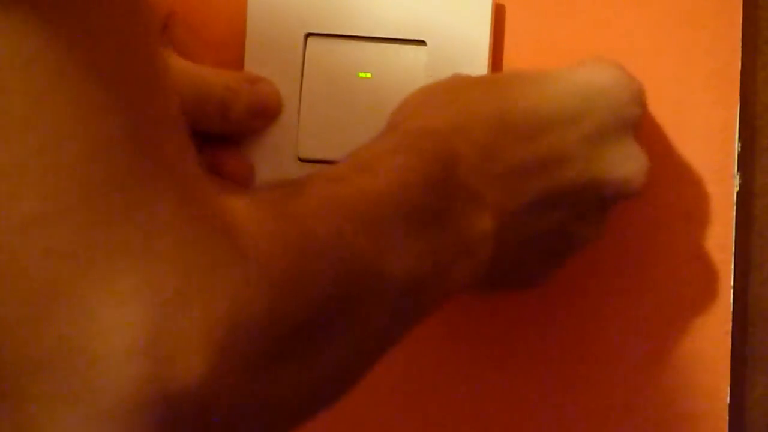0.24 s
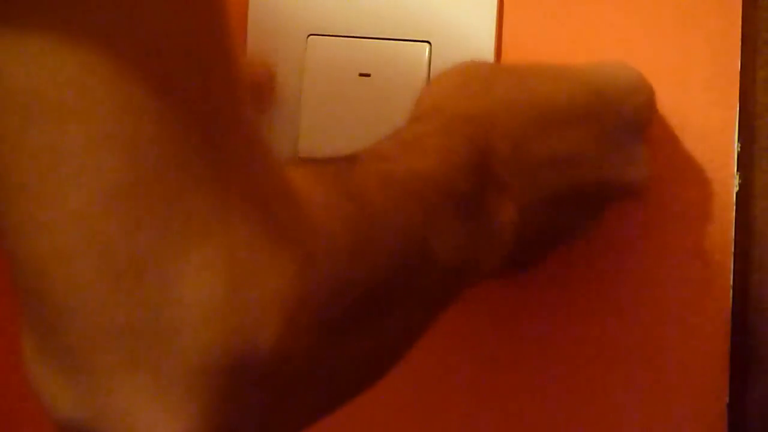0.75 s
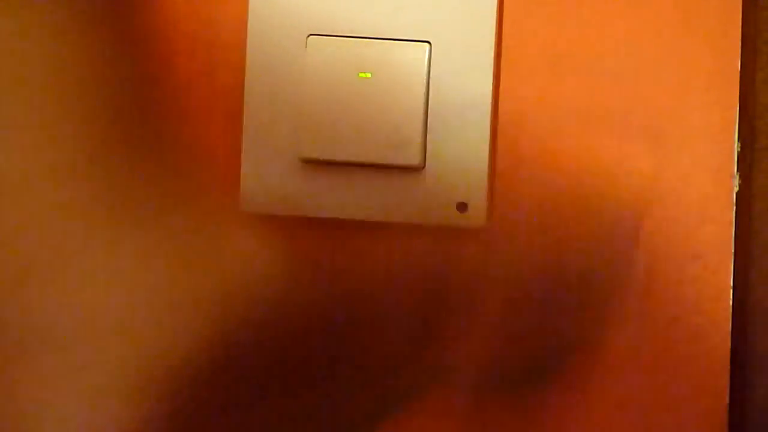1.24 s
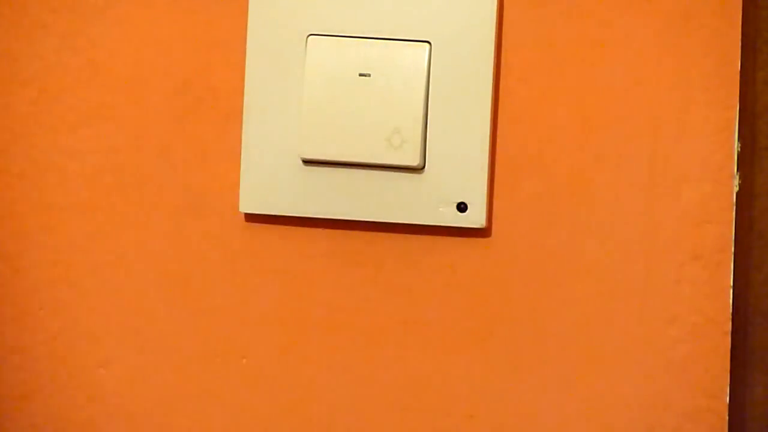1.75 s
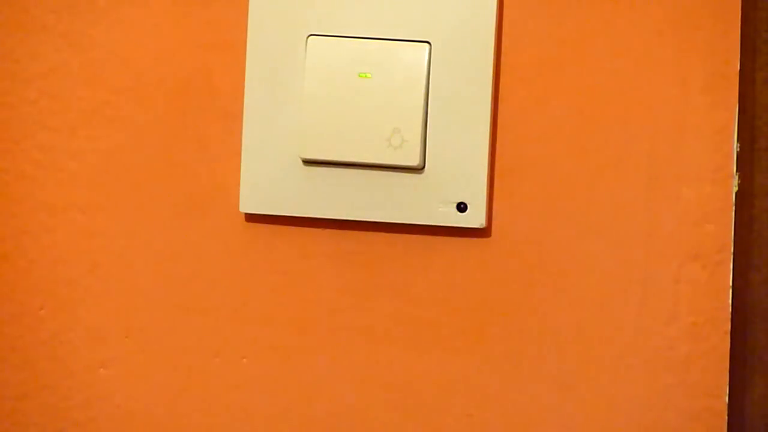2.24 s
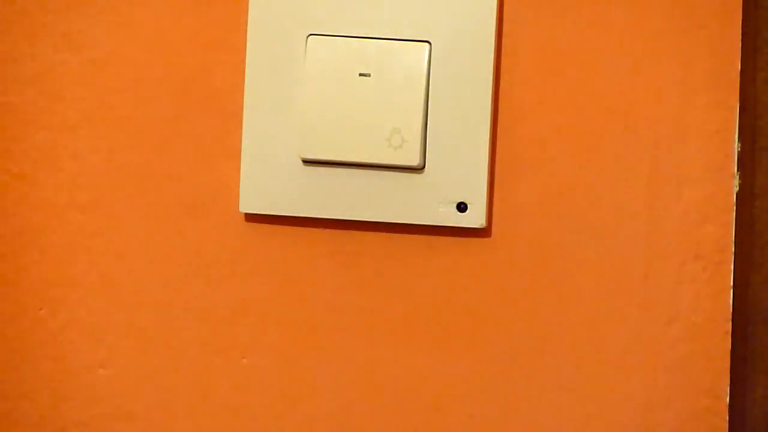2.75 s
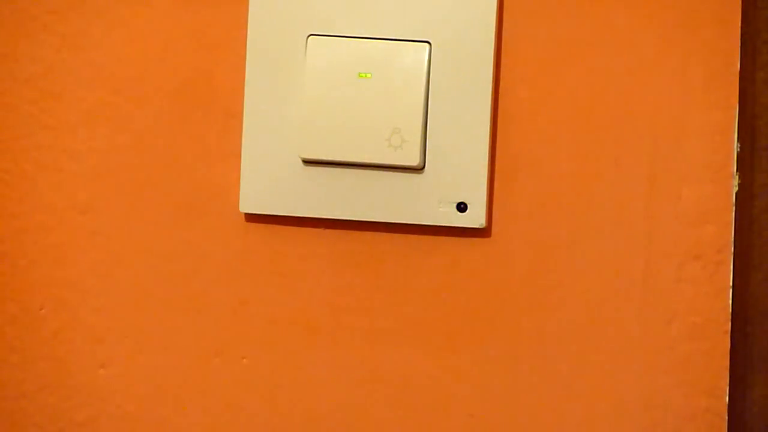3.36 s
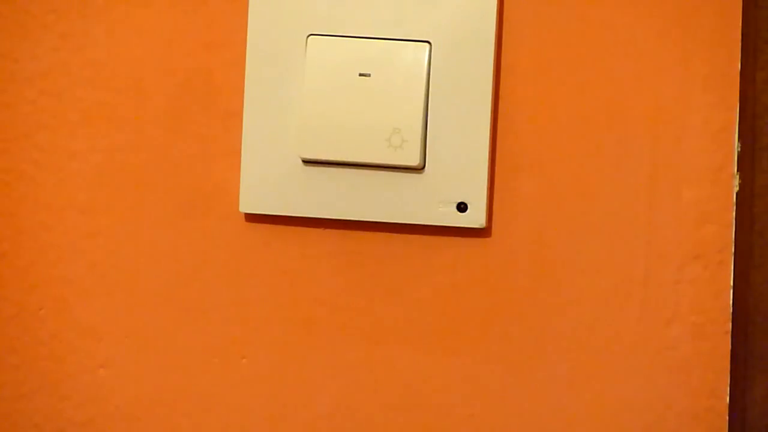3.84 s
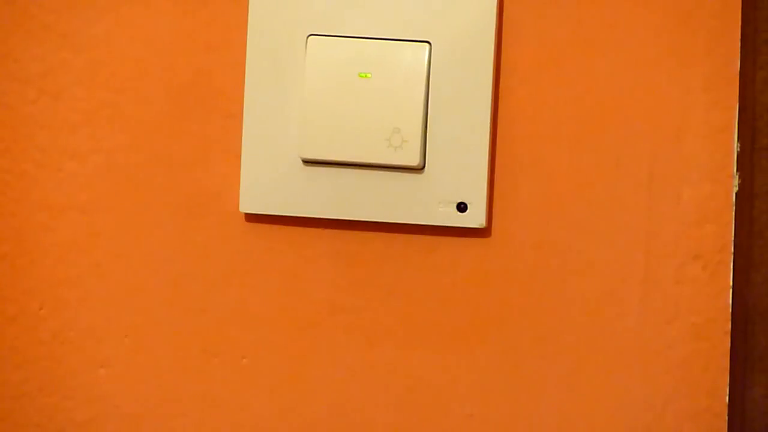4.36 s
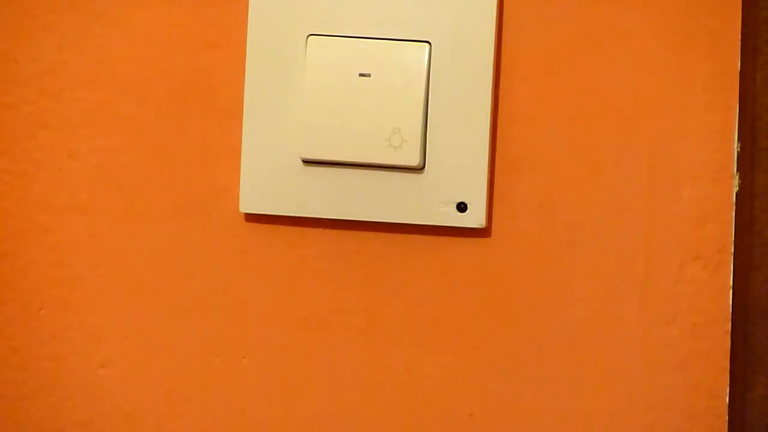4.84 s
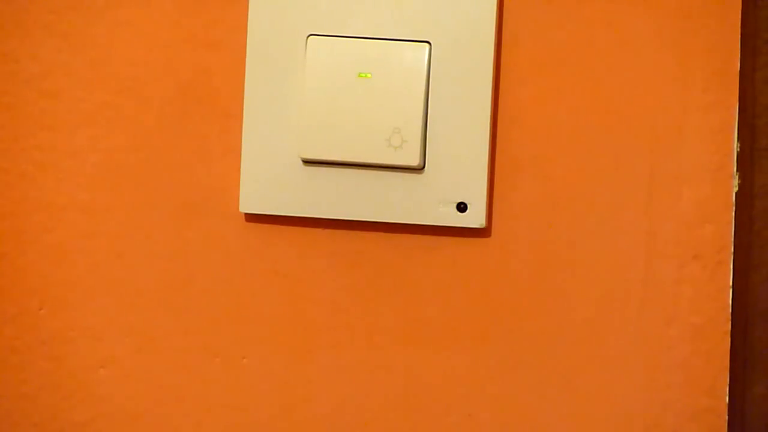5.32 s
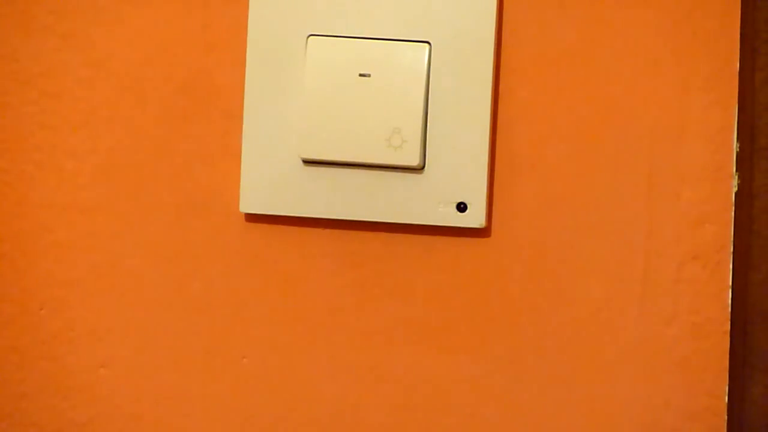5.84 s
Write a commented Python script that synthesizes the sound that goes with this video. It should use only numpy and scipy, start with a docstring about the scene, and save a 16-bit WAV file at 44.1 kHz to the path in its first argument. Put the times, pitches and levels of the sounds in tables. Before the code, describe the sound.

A plastic wall button is pressed close to the microphone with a sharp click, a brief springy ring and a low bump. Someone then moves about, with rustling clothes, a few hollow clacks and soft knocks. About five seconds after the press, a relay snaps over with a short metallic rattle. An appliance hums low and steady throughout in the small, hard-walled hallway.

```python
"""Wall button and relay in a hallway

A plastic pushbutton is pressed close by in a small hard-walled hallway; five seconds later a relay
snaps over. Each is a burst of hard contacts heard through a shell, with metal parts ringing on.
In between, someone moves about with soft knocks, hollow clacks and rustling clothes.
An appliance hums steadily over quiet room air."""
import sys
import numpy as np
from scipy import signal
from scipy.fft import rfft, irfft, next_fast_len
from scipy.io import wavfile
from scipy.ndimage import map_coordinates

SR = 44100
rng = np.random.default_rng(int(sys.argv[2]) if len(sys.argv) > 2 else 0)


def generate_wav(signal):
    """Clip the signal to [-1, 1] and save it as 16-bit WAV at the path in sys.argv[1]."""
    frames = np.transpose(np.atleast_2d(signal))
    scaled = np.clip(frames, -1, 1) * 32767
    pcm = np.round(scaled).astype(np.int16)
    wavfile.write(sys.argv[1], SR, pcm)


N = 268128
TAIL = SR // 2
TIME = np.arange(N) / SR


def amp(db):
    """Decibels to gain."""
    return 10 ** (np.asarray(db) / 20)


def unit_rms(x):
    """Scale to rms 1."""
    return x / np.sqrt(np.mean(x ** 2) + 1e-20)


def along(points, hz):
    """Interpolate (freq_hz, value) points on a log axis."""
    freqs, values = np.transpose(points)
    return np.interp(np.log(hz + 1), np.log(freqs + 1), values)


def wobble(rate_hz):
    """Smooth random curve, rate_hz knots a second."""
    knots = rng.standard_normal(int(N * rate_hz / SR) + 4)
    return map_coordinates(knots, [TIME * rate_hz], mode="nearest")


def filtered(x, response):
    """Apply a frequency-dependent gain."""
    n = x.shape[-1]
    size = next_fast_len(n + TAIL)
    return irfft(rfft(x, size) * response(np.fft.rfftfreq(size, 1 / SR)), size)[..., :n]


def body_response(spectrum, size=4096):
    """Minimum-phase impulse response of a body with this spectrum."""
    gain = amp(along(spectrum, np.fft.rfftfreq(size, 1 / SR)))
    cepstrum = irfft(np.log(gain + 1e-6))
    cepstrum[1:size // 2] *= 2
    cepstrum[size // 2 + 1:] = 0
    return irfft(np.exp(rfft(cepstrum)))[None]


def stereo_noise(spectrum, width):
    """Coloured noise of rms 1; width sets side against mid."""
    mid, side = rng.standard_normal((2, N))
    side = filtered(side, lambda hz: amp(along(width, hz)))
    channels = np.array([mid + side, mid - side])
    return unit_rms(filtered(channels, lambda hz: amp(along(spectrum, hz))))


def add(track, start_s, sound):
    """Mix a sound into a track."""
    part = track[:, round(start_s * SR):][:, :sound.shape[-1]]
    part += sound[:, :part.shape[-1]]


# Hallway decay: freq_hz, t60_s
HALL_DECAY = [(80, 0.29), (500, 0.3), (2000, 0.23), (5500, 0.23), (12000, 0.21)]
# Hallway stereo width: freq_hz, side_minus_mid_db
HALL_SPREAD = [(100, -26), (600, -20.5), (1700, -11.5), (3300, -6.5), (6000, -4), (11000, -1)]


def hallway_blow(rise_s, near_db=0, near_t60_s=0.023):
    """A blow swells over the contact time, bursts off near surfaces and dies in the hallway."""
    hz, t, bands = signal.stft(rng.standard_normal((2, TAIL)), SR, nperseg=256)
    bands[1] *= amp(along(HALL_SPREAD, hz))[:, None]
    bands *= amp(-60 * t / along(HALL_DECAY, hz)[:, None])
    mid, side = signal.istft(bands, SR, nperseg=256)[1][:, :TAIL]
    age_s = np.arange(TAIL) / SR
    envelope = (1 - np.exp(-age_s / rise_s)) * (1 + amp(near_db - 60 * age_s / near_t60_s))
    return np.array([mid + side, mid - side]) * envelope / np.linalg.norm(mid * envelope)


# Mains and motor lines: pitch_hz, level_db
HUM_LINES = [(119.9, -56), (138.8, -80.5), (173.4, -66.5), (190.8, -63), (209.8, -72), (279.8, -71.5)]


def appliance_hum(mains_drift_rad=0.099, motor_drift_rad=0.407, waver_db_per_rad=4):
    """A firm mains tone with weaker, less steady motor lines."""
    mains_db = max(db for _, db in HUM_LINES)
    sound = np.zeros(N)
    for hz, db in HUM_LINES:
        drift_rad = mains_drift_rad if db == mains_db else motor_drift_rad
        gain = amp(db + waver_db_per_rad * drift_rad * wobble(3.1))
        sound += gain * np.sin(2 * np.pi * hz * TIME + drift_rad * wobble(3))
    return amp(3) * sound


# Room rumble and hiss: freq_hz, density_db
AIR_SPECTRUM = [(20, -25), (45, -21.5), (90, -21.5), (135, -12.5), (185, -12), (230, -16.5), (320, -15.5),
                (420, -16.5), (600, -16), (730, -19.5), (1200, -25), (2300, -31.5), (6000, -36),
                (15500, -41)]
# Their stereo width: freq_hz, side_minus_mid_db
AIR_SPREAD = [(60, -5), (110, -23), (200, -11.5), (380, -11.5), (700, -9), (1290, -1.5), (2380, 2.5),
              (4400, 3), (8120, 0), (15000, -0.5)]


def room_air():
    """Quiet room rumble and microphone hiss."""
    return amp(-56 + 0.41 * wobble(2.92)) * stereo_noise(AIR_SPECTRUM, AIR_SPREAD)


def resonate(modes, blow):
    """A blow excites a few damped resonances."""
    t = np.arange(SR // 20) / SR
    response = sum(amp(db) * width_hz * np.exp(-np.pi * width_hz * t) * np.sin(2 * np.pi * hz * t)
                   for hz, width_hz, db in modes)
    return signal.fftconvolve(response[None] / np.linalg.norm(response), blow, axes=1)


# Tick resonances: pitch_hz, width_hz, level_db
TICK_MODES = [(617, 120, 1), (3800, 300, -12), (6430, 90, -3)]


def handling_tick():
    """One faint tick of handling before the push."""
    sound = np.zeros((2, N))
    add(sound, start_s=0.053, sound=amp(-21.5) * resonate(TICK_MODES, hallway_blow(rise_s=0.001)))
    return sound


def stroke_speed(peak_s, length_s, rise_share=0.46, roundness=1.93):
    """Bell-shaped speed of one movement; it gathers a little faster than it dies."""
    span_s = length_s * np.where(TIME < peak_s, rise_share, 1 - rise_share)
    return np.exp(-np.abs((TIME - peak_s) / span_s) ** roundness)


# Strokes of cloth over cloth: peak_s, length_s, level_db, swish_over_rub_db
CLOTH_STROKES = [(0.064, 0.033, -64.5, 11), (.915, 0.046, -63, -15.5), (1.417, 0.052, -55.5, -16),
                 (1.589, .055, -52, -4.5), (1.675, 0.069, -55, -1.5), (2.152, 0.52, -72.5, 9.5),
                 (2.662, 0.16, -54.5, -6), (3.002, .04, -54, 0.5), (3.094, 0.29, -57.5, -7),
                 (3.558, .055, -48, -8), (3.648, 0.36, -55, -7.5), (3.977, 0.37, -54.5, -2),
                 (4.32, .045, -60.5, 5.5), (4.501, 0.09, -48, -9), (4.593, 0.29, -53.5, -8.5),
                 (4.977, 0.024, -62.5, 5.5)]
# Sleeve rub: freq_hz, density_db
RUB_SPECTRUM = [(180, -6.5), (300, -5.5), (530, -7.5), (577, -11.5), (1680, -6.5), (2360, -6.5),
                (2650, -7.5), (9000, -17), (11700, -55), (19800, -120)]
# Cloth swish: freq_hz, density_db
SWISH_SPECTRUM = [(2500, -8), (5500, -3.5), (9000, -1.5), (12500, -1), (15000, -9)]
# Cloth stereo width: freq_hz, side_minus_mid_db
CLOTH_SPREAD = [(500, -14.5), (1700, -10), (3500, -2.5), (10000, -0.5)]


def clothes(stir_start_s=1.5, stir_end_s=5.02, fade_s=0.052):
    """Cloth rustles faintly while the body stirs; each stroke swells a low rub and a high swish."""
    stirring = (np.tanh((TIME - stir_start_s) / fade_s) - np.tanh((TIME - stir_end_s) / fade_s)) / 2
    rub_gain, swish_gain = amp(-61.5) * stirring, amp(-65.5) * stirring
    for peak_s, length_s, db, swish_db in CLOTH_STROKES:
        speed = stroke_speed(peak_s, length_s)
        rub_gain = np.hypot(rub_gain, amp(db) * speed)
        swish_gain = np.hypot(swish_gain, amp(db + swish_db) * speed)
    catch = amp(0.76 * wobble(45))  # the weave catches and slips
    rub = rub_gain * stereo_noise(RUB_SPECTRUM, CLOTH_SPREAD)
    swish = swish_gain * stereo_noise(SWISH_SPECTRUM, CLOTH_SPREAD)
    return catch * (rub + swish)


# Handling and steps: start_s, level_db, thud_db, snap_db, resonance_hz, resonance_db
SOFT_KNOCKS = [(0.295, -48.5, -15, -5.5, 4630, 8.5), (0.307, -46.5, -9.5, -4, 1418, 10),
               (2.474, -40.5, -19, -14.5, 1455, 6.5), (2.828, -53, -14, -38, 910, 6.5),
               (2.985, -39, -6, -10, 413, 9.5), (3.407, -40, -35, -12, 786, 3),
               (3.959, -51.5, -11, -27, 504, 8), (4.505, -53.5, -30, 1, 2330, 14),
               (4.623, -47, -17, -26, 335, 15.5), (5.038, -44.5, -34, -3.5, 2600, 11)]


def knocks(rise_cycles=2.1):
    """Soft contacts: less snap gives more wood tone, a lower resonance a slower rise."""
    sound = np.zeros((2, N))
    for start_s, db, thud_db, snap_db, resonance_hz, resonance_db in SOFT_KNOCKS:
        wood_db = -4 - 0.28 * snap_db
        colour = body_response([
            (25, thud_db - 10), (85, thud_db + 19.5),
            (230, wood_db), (650, wood_db + 1.5), (1500, 0),
            (2600, 0.12 * snap_db), (3600, snap_db), (5200, snap_db - 3),
            (8000, snap_db - 16.5), (15000, snap_db - 21)])
        blow = hallway_blow(rise_cycles / resonance_hz, near_db=-3, near_t60_s=0.043)
        knock = signal.fftconvolve(colour, blow, axes=1)
        resonant = signal.lfilter(*signal.iirpeak(resonance_hz, Q=6, fs=SR), knock)
        add(sound, start_s, amp(db + 36.5) * (knock + (amp(resonance_db) - 1) * resonant))
    return sound


def metal_ring(modes, t60_s):
    """Struck metal; each mode reaches the two channels at a different phase."""
    t = np.arange(TAIL) / SR
    hz, db = np.transpose(modes)
    phase, spread, scatter_db = rng.standard_normal((3, len(hz)))
    offset_rad = spread * amp(along(HALL_SPREAD, hz)) * np.array([[1], [-1]])
    waves = np.sin(2 * np.pi * hz[:, None] * t + (np.pi * phase + offset_rad)[..., None])
    sound = (amp(db + scatter_db)[:, None] * waves).sum(axis=1) * amp(-60 * t / t60_s)
    return sound / np.linalg.norm(sound[0])


def mechanism(contacts, shell, modes, snap_db, ring_db, ring_t60_s, dulling, treble_hz=6000, **shape):
    """Quick hard contacts sound through a plastic shell; the hardest sets the metal ringing."""
    blows = np.zeros((2, N))
    for start_s, db in contacts:
        blow = hallway_blow(**shape)
        dull = signal.lfilter(*signal.butter(1, treble_hz, fs=SR), blow)
        treble = amp(dulling * db) * (blow - dull)  # gentler contacts are duller
        add(blows, start_s, amp(db) * (dull + treble))
    colour = body_response(shell)
    sound = amp(snap_db) * signal.fftconvolve(blows, colour / np.linalg.norm(colour), axes=1)[:, :N]
    hardest_s, _ = max(contacts, key=lambda contact: contact[1])
    add(sound, hardest_s, amp(ring_db) * metal_ring(modes, ring_t60_s))
    return sound


# Rocker, spring and stop contacts: start_s, level_db
BUTTON_CONTACTS = [(.4092, -11.5), (.4135, -2), (.4215, -0.5), (.425, 2), (.430, 0.5), (.4425, -6.5),
                   (.4765, -13.5)]
# Plastic cover: freq_hz, density_db
BUTTON_COVER = [(100, -19.5), (250, -25), (600, -9.5), (780, -10), (900, -21), (1050, -8), (1400, -9),
                (1850, -16.5), (2800, -10.5), (4800, -9), (5400, -1), (6400, -8), (8300, -15),
                (13400, -17.5), (15500, -43.5)]
# Spring and frame modes: pitch_hz, level_db
BUTTON_MODES = [(626.3, -51.1), (674.9, -52.4), (751.8, -52.0), (1328.8, -54.5), (1384.9, -47.5),
                (3024.2, -51.6), (3057.5, -54.3), (5020.1, -50.6), (5146.9, -44.2), (5224.0, -49.0),
                (5306.8, -44.1), (5383.3, -46.2), (5452.8, -46.9), (5488.6, -45.9), (5579.8, -45.7),
                (5661.4, -45.5), (5707.8, -50.2), (5792.3, -50.0), (5904.1, -50.9), (6870.8, -55.1),
                (6916.4, -55.2), (7014.4, -53.6)]


def button():
    """The rocker tips over and hits its stop, close by."""
    return mechanism(BUTTON_CONTACTS, BUTTON_COVER, BUTTON_MODES,
                     snap_db=6, ring_db=9, ring_t60_s=0.22, dulling=0.6,
                     rise_s=0.0002, near_db=17, near_t60_s=0.004)


# Sways of the wall and the hand holding the microphone: start_s, pitch_hz, level_db, t60_s
JOLT_SWAYS = [(0.429, 57.3, -32, 0.27), (.44, 27, -40, 0.75), (.92, 30, -52, 0.74)]


def jolt(rise_s=0.0055):
    """The push and the hand's release shake the microphone."""
    sound = np.zeros(N)
    for start_s, hz, db, t60_s in JOLT_SWAYS:
        age_s = np.maximum(TIME - start_s, 0)
        envelope = (1 - np.exp(-age_s / rise_s)) * amp(db - 60 * age_s / t60_s)
        sound += envelope * np.sin(2 * np.pi * hz * age_s)
    return sound


# Clacks of a small hard object: start_s, level_db, brightness_db, rise_s
CLACK_HITS = [(1.906, -45.5, -17, 0.0016), (2.029, -42, -9.5, 0.013), (2.053, -35, 16, 0.00099)]
# Its hollow resonances: pitch_hz, width_hz, level_db
CLACK_MODES = [(655, 50, 8.5), (1173, 63, 5.5), (1707, 52, 6.5), (2470, 490, -4.5), (3650, 390, 6.5),
               (4300, 910, -9.5)]


def clacks(treble_hz=1900):
    """A hollow object clacks; harder hits bring out its upper resonances."""
    sound = np.zeros((2, N))
    for start_s, db, brightness_db, rise_s in CLACK_HITS:
        modes = [(hz, width_hz, mode_db + brightness_db * (hz > treble_hz))
                 for hz, width_hz, mode_db in CLACK_MODES]
        blow = hallway_blow(rise_s, near_db=6, near_t60_s=0.0046)
        add(sound, start_s, amp(db + 28) * resonate(modes, blow))
    return sound


# Armature contacts and rebounds: start_s, level_db
RELAY_CONTACTS = [(5.3268, -14.5), (5.3313, -0.5), (5.3335, 1), (5.3405, 0), (5.3925, -7.5), (5.3995, -6.5),
                  (5.4215, -16)]
# Relay case: freq_hz, density_db
RELAY_CASE = [(70, -19), (140, -7), (250, -14.5), (600, -11.5), (830, -5.5), (1380, -5.5), (1750, -2.5),
              (2550, -6.5), (3400, -5.5), (3850, -0.5), (4250, -3), (4700, -13.5), (6200, -13),
              (11500, -20.5), (15500, -36)]
# Modes of its metal parts: pitch_hz, level_db
RELAY_MODES = [(841.0, -54.6), (1136.2, -52.6), (1175.2, -53.6), (1575.3, -52.2), (1688.3, -54.1),
               (1722.3, -54.2), (1774.6, -54.5), (1911.7, -54.5), (1956.8, -51.2), (2015.0, -52.3),
               (2092.6, -55.1), (2938.9, -51.5), (3610.0, -50.2), (3711.3, -54.7), (3780.4, -50.1),
               (3898.0, -55.9), (3932.3, -54.3), (4190.7, -54.5), (4291.3, -54.7), (4327.3, -56.5)]


def relay():
    """The armature slams over and rebounds."""
    return mechanism(RELAY_CONTACTS, RELAY_CASE, RELAY_MODES,
                     snap_db=0, ring_db=4, ring_t60_s=0.26, dulling=0.98,
                     rise_s=0.0005, near_db=11, near_t60_s=0.009)


# Channel balance: freq_hz, left_minus_right_db
BALANCE = [(100, 1.4), (700, 1.2), (3000, 1), (6000, -0.1), (10000, 0.1)]


def scene():
    """Everything in the hallway, a little stronger on the left."""
    sound = appliance_hum() + room_air() + handling_tick() + clothes() + knocks()
    sound += button() + jolt() + clacks() + relay()
    return filtered(sound, lambda hz: amp(along(BALANCE, hz) * np.array([[0.5], [-0.5]])))


def record(dry, notch_hz=8000, top_hz=15400):
    """A narrow treble notch and a steep band limit."""
    notched = signal.lfilter(*signal.iirnotch(notch_hz, Q=20, fs=SR), dry)
    return filtered(notched, lambda hz: hz < top_hz)


dry = scene()
out = record(dry)
generate_wav(out)
```